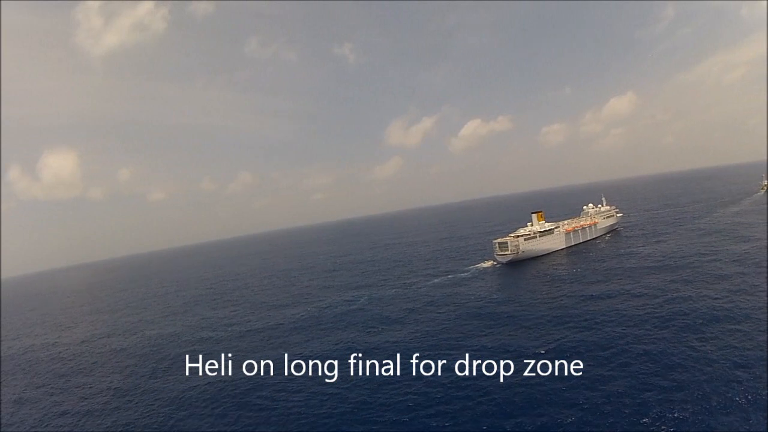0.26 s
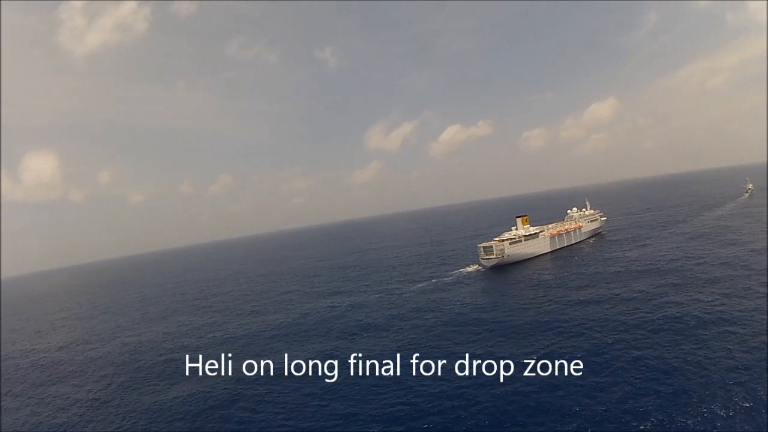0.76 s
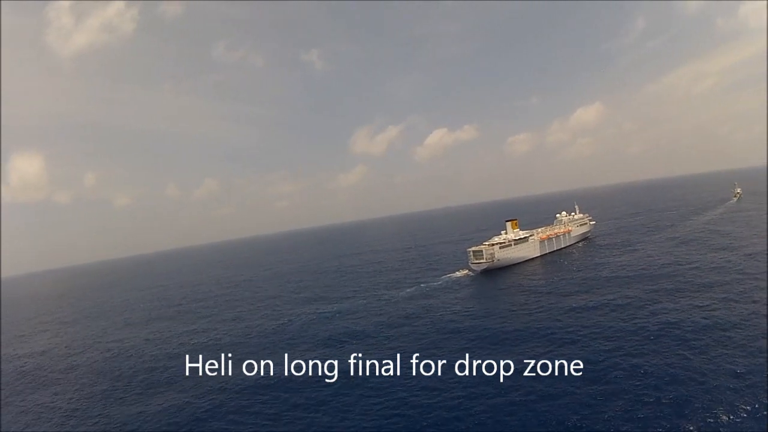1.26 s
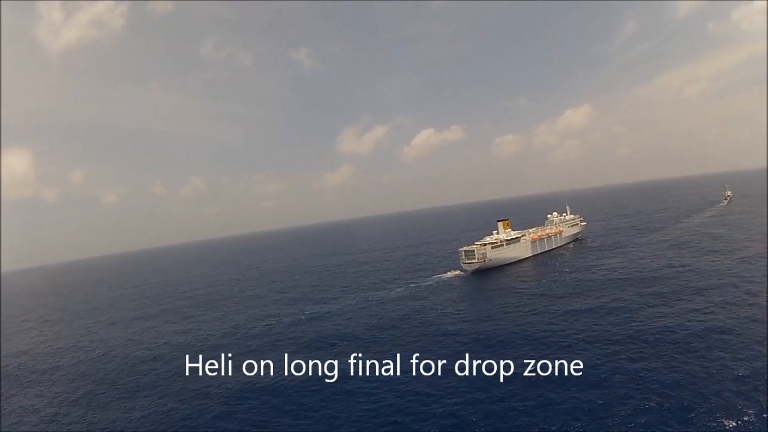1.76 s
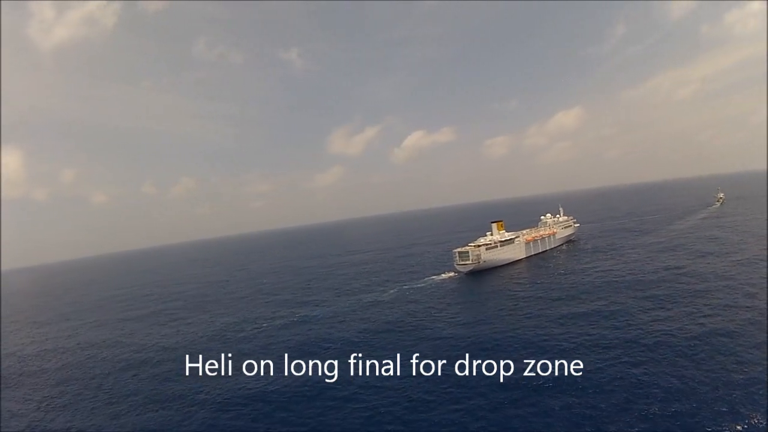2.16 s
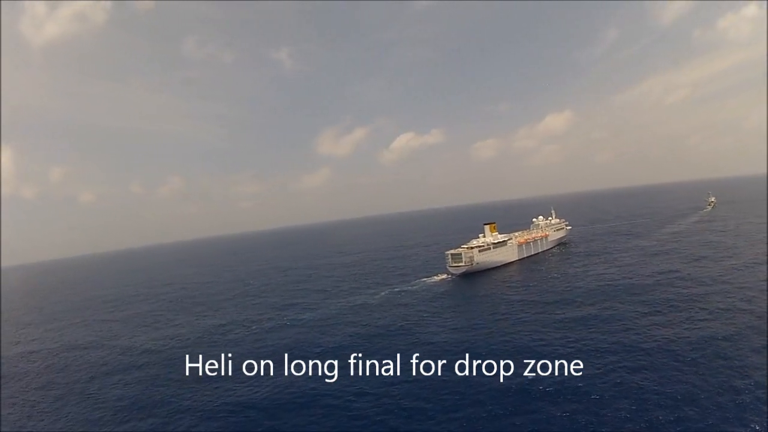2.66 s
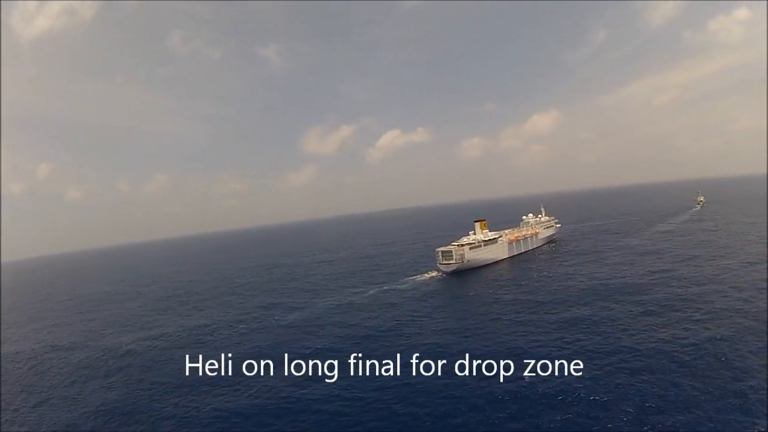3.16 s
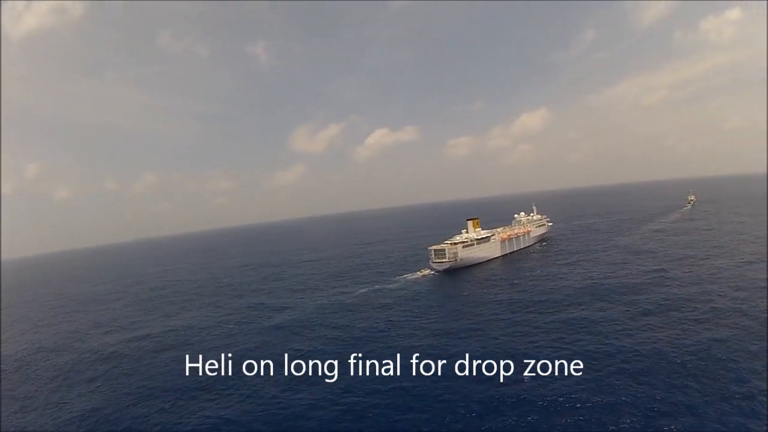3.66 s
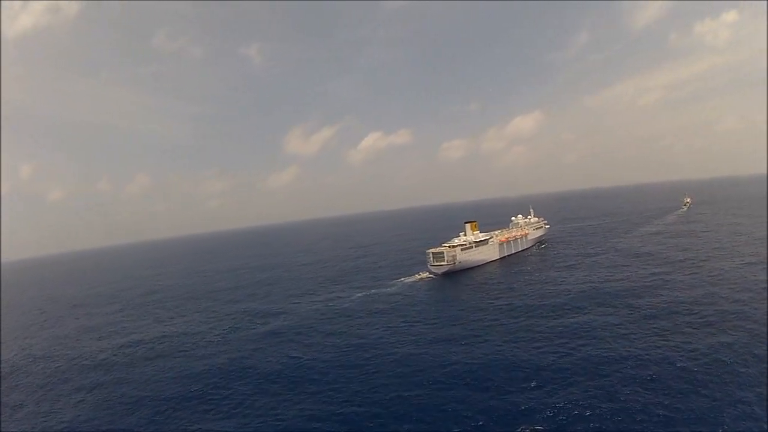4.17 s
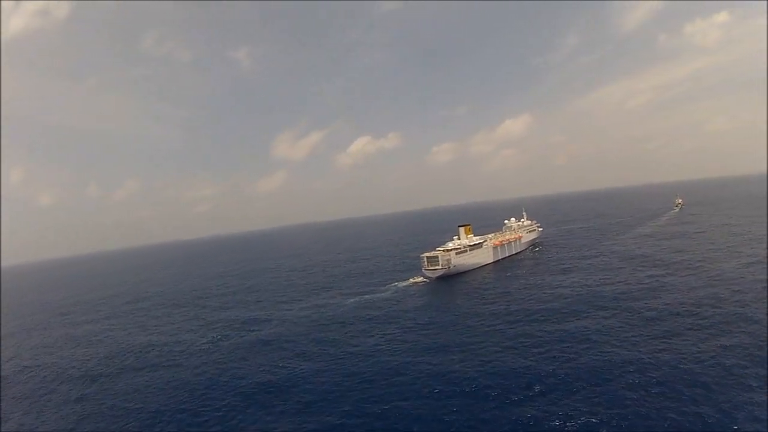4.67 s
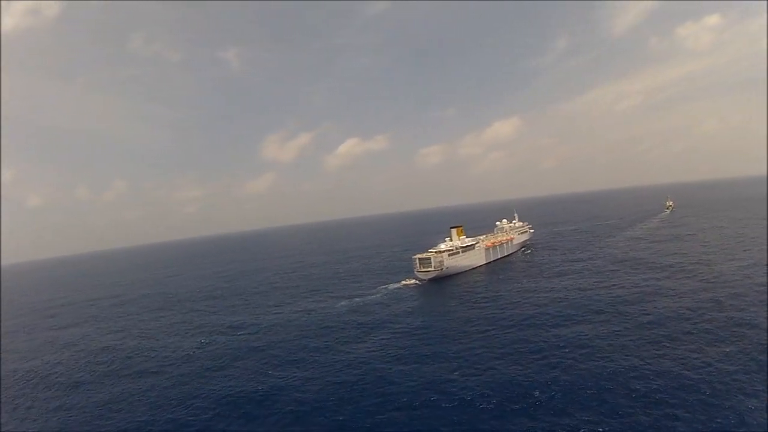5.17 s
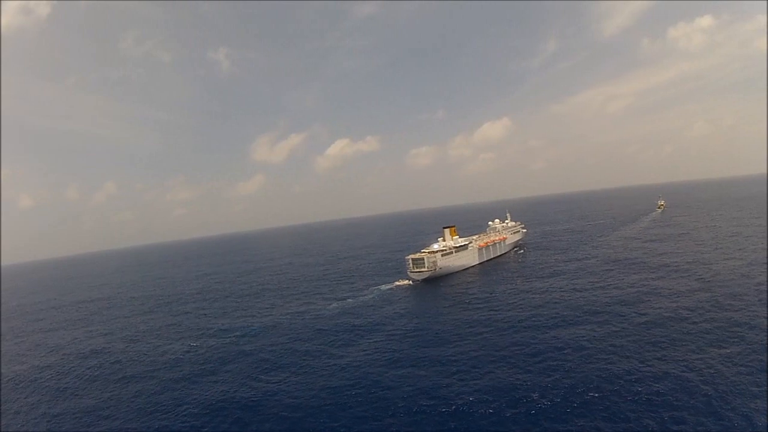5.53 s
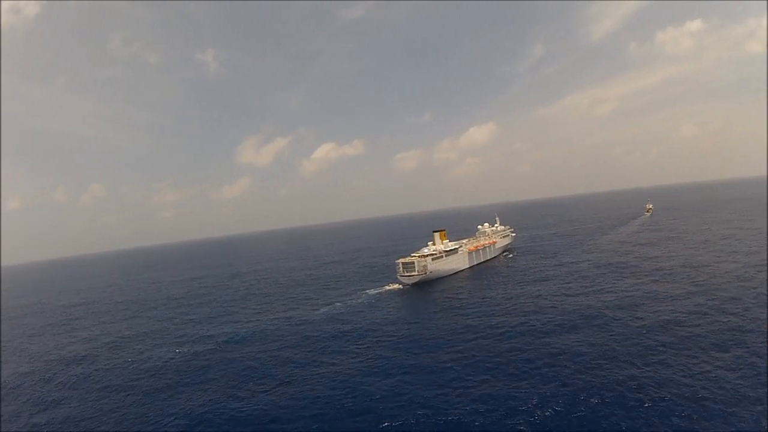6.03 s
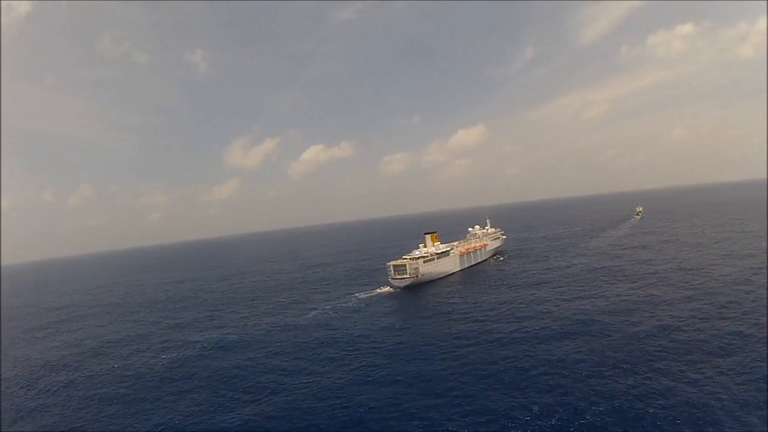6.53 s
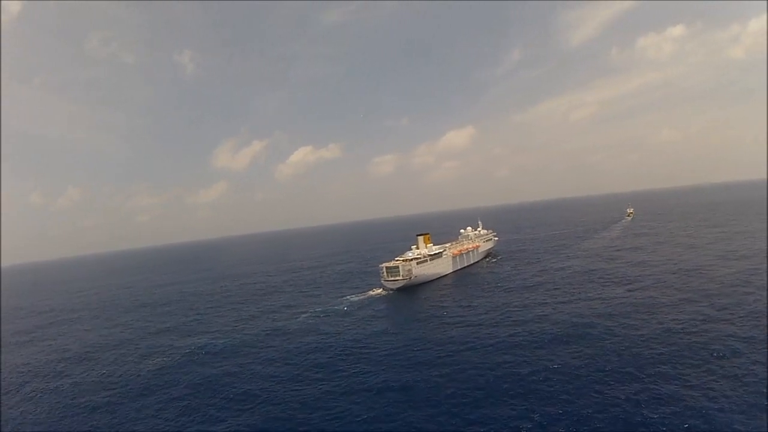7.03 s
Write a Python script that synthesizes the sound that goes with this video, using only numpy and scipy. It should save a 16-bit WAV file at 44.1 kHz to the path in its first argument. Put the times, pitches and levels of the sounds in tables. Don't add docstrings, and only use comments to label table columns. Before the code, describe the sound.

Heard from inside a helicopter flying over open sea, a deep, resonant rotor boom dominates without a break. It wavers in the first two seconds, dropping away briefly, then gradually grows stronger to the end. Low wind roar and a brighter swish are chopped about twenty times a second, with faint tail rotor and gear hums beneath. A small enclosed camera microphone gives a muffled, slightly gritty mono sound.

```python
import sys
import numpy as np
from scipy import signal
from scipy.fft import rfft, irfft, next_fast_len
from scipy.io import wavfile
from scipy.ndimage import uniform_filter1d, map_coordinates

SR = 44100
rng = np.random.default_rng(int(sys.argv[2]) if len(sys.argv) > 2 else 0)


def master(y):
    cut = np.clip(np.atleast_2d(y).T, -1, 1)
    pcm = np.round(cut * 32767)
    wavfile.write(sys.argv[1], SR, pcm.astype(np.int16))


def ratio(d):
    e = np.asarray(d, float) / 20
    return 10 ** e


N = 321930

# start_s, pass_rate_hz
ROTOR_SPEED = [(0.0, 20.333), (0.91, 20.315), (1.82, 20.272), (2.74, 20.264), (3.65, 20.24), (4.56, 20.297),
               (5.48, 20.257), (6.39, 20.263), (7.3, 20.316)]
FIRST_PASS = .0106
BLADES = 3
PASSES = FIRST_PASS + np.cumsum(np.interp(np.arange(N) / SR, *np.transpose(ROTOR_SPEED))) / SR

# multiple, level_db, unsteadiness_db
STEADY_MULTIPLES = [(2, -25, .6), (3, -32.5, 2), (7, -48, 3), (8, -53, 4), (9, -50, 4), (10, -52, 4),
                    (11, -54, 4), (12, -52, 3), (13, -59, 3), (15, -59, 4)]
# shaft_multiple, level_db
UNEQUAL_BLADES = [(7, -56), (8, -49), (10, -44), (11, -33), (13, -39), (14, -46)]
# pitch_hz, width_hz, level_db
CABIN_MODES = [(40.6, 3, 0), (81, 8, 0)]
# start_s, level_db
ROTOR_LOAD = [(0.0, -19.5), (0.45, -16.5), (1.3, -28), (1.7, -18.0), (2.3, -17.6), (3.2, -15.5), (4.2, -14),
              (5.1, -15.5), (5.85, -13.9), (6.0, -10.5), (7.3, -11)]
MEAN_LOAD_DB = -16
# centre_s, change_db
ROTOR_GUSTS = [(0.15, -2), (0.42, -3.5), (0.58, -22), (0.82, -1.5), (0.98, -3), (1.11, 7), (1.25, 6),
               (1.78, -7.5), (1.94, -8), (2.1, -16), (2.55, -3.5), (2.82, 1.5), (3.4, 3), (3.55, -4),
               (4.01, 2.5), (4.32, -5.5), (5.09, -4.5), (6.26, -2), (7.03, -1.5)]
GUST_S = .04
FIFTH_DB, FIFTH_GROWS, FIFTH_SHAKE_DB = -36, .25, 3.5
SIXTH_DB, SIXTH_GROWS, SIXTH_SHAKE_DB = -38, .85, 1.6

# pitch_hz, level_db, line_width_hz
GEAR_TONES = [(16.6, -63, 1), (49.7, -48, .6), (152, -56, 1), (253.2, -55, 1.5), (338, -51.5, 1.8),
              (592, -57, 6), (731, -58, 12), (1113.5, -59, 2), (1697, -55, 5)]
# freq_hz, level_db (per Hz)
BUFFET_SPECTRUM = [(10, -35), (30, -25), (45, -17), (57, -15), (65, -6), (75, -1), (82, -1), (92, -8),
                   (105, -12), (130, -19), (170, -50)]

# start_s, level_db
AIR_STRENGTH = [(0, -0.9), (.7, -1.4), (2.2, 0.37), (4.6, -0.32), (7.3, -0.35)]
# freq_hz, level_db (per Hz)
ROAR_SPECTRUM = [(100, 7), (135, 0), (200, -0.5), (245, -6), (275, -7), (330, -2), (450, -9), (560, -2.5),
                 (620, -4), (660, -9), (740, -0.5), (830, -3.5), (1050, -12), (1250, -37)]
# freq_hz, level_db (per Hz)
SWISH_SPECTRUM = [(850, -41), (1150, -4), (1350, -5.5), (1650, -1), (1900, -5.5), (2130, -1), (2550, -4),
                  (2700, -8), (3200, -16), (3700, -13), (4400, -21), (4750, -23), (5000, -27),
                  (5600, -25.5)]
ROAR_DB, ROAR_GROWS, SWISH_DB = -36, 0.062, -35.5
# freq_hz, moment_passes (fraction of a pass), depth_db
BLADE_LULL = [(300, .75, 2), (900, .2, 2.2), (1550, .09, 5.5), (2420, .38, 2.5), (2800, .17, 5.5),
              (3250, .12, 1.5), (3750, .19, 6), (5600, .12, 4)]
# start_passes, low_hz, end_passes, high_hz, level_db
ECHO_STROKES = [(.1, 200, .4, 300, 2), (.45, 650, .8, 1200, 2.2), (.82, 700, 1.08, 1200, 3.5),
                (.28, 1420, .72, 1750, 3.5), (.66, 1800, 1.02, 2250, 5.8), (.92, 2450, 1.06, 2600, 4),
                (.29, 2620, .41, 2780, 7), (.55, 2930, .75, 3050, 4), (.66, 3650, .9, 3720, 4.2),
                (.5, 4150, .82, 4450, 3.6), (.5, 4750, .9, 5450, 3.8)]
STROKE_HZ, STROKE_WIDENS = 120, .025

# freq_hz, level_db
SLOW_RATE_FILTER = [(5600, 0), (5800, -8), (6000, -12), (6200, -30), (6400, -120)]
HOLD_HZ, STEP_HZ, TOP_HZ = 12000, 48000, 15310


def unit(x):
    return x / np.sqrt(np.mean(x ** 2) + 1e-20)


def along(points, hz, axis=1):
    table = np.array(points)
    return np.interp(np.log(hz + 1), np.log(table[:, 0] + 1), table[:, axis])


def curves(rows):
    s, *columns = np.transpose(rows)
    return [np.interp(np.arange(N) / SR, s, column) for column in columns]


def wobble(rate):
    coarse = np.arange(0, N + 64, 64)
    knots = rng.standard_normal(int(N * rate / SR) + 4)
    return np.interp(np.arange(N), coarse, map_coordinates(knots, [coarse * rate / SR]))


def filtered(x, response):
    m = next_fast_len(N + 8192)
    return irfft(rfft(x, m) * response(np.fft.rfftfreq(m, 1 / SR)), m)[:N]


def extra_load_db():
    return uniform_filter1d(curves(ROTOR_LOAD)[0], size=SR // 2) - MEAN_LOAD_DB


def hums():
    t = np.arange(N) / SR
    total = np.zeros(N)
    for hz, db, width in GEAR_TONES:
        level = np.sqrt(2) * ratio(db + 1.8 * wobble(width))
        total += level * np.cos(2 * np.pi * hz * t + 1.5 * wobble(width))
    return total


def patches(shape, bins, frames):
    field = uniform_filter1d(rng.standard_normal(shape), size=bins, axis=0)
    return unit(uniform_filter1d(field, size=frames, axis=1))


def blade_pattern(hz, count):
    def since(moment):
        return (count - moment + .5) % 1 - .5

    lull_depth_db = along(BLADE_LULL, hz, axis=2)
    gain_db = -lull_depth_db * np.exp(-(since(along(BLADE_LULL, hz)) / .15) ** 2)
    for start, low_hz, end, high_hz, db in ECHO_STROKES:
        middle = (start + end) / 2
        place = since(middle) / (end - start)
        centre_hz = (low_hz + high_hz) / 2 + place * (high_hz - low_hz)
        width_hz = STROKE_HZ + STROKE_WIDENS * low_hz
        which_pass = np.round(count - middle).astype(int) + 1
        luck = rng.standard_normal(int(count[-1]) + 3)[which_pass]
        in_time = np.exp(-(2 * place) ** 4)
        in_pitch = np.exp(-((hz - centre_hz) / width_hz) ** 2)
        gain_db += db * (1 + .24 * luck) * in_time * in_pitch
    return gain_db


def chopped(spectrum, depth, patchy_db, scatter_db):
    hz, t, z = signal.stft(rng.standard_normal(N), SR, nperseg=384, noverlap=288)
    at = np.minimum((t * SR).astype(int), N - 1)
    low = hz < spectrum[-1][0]
    z[low] *= ratio(depth * blade_pattern(hz[low, None], PASSES[at]))
    lead_db = .35 * np.cos(2 * np.pi * (PASSES[at] / BLADES - .92))
    gain = ratio(lead_db + patchy_db * patches(z.shape, 3, 6) + scatter_db * wobble(35)[at])
    noise = signal.istft(z * gain, SR, nperseg=384, noverlap=288)[1][:N]
    return unit(filtered(noise, lambda f: ratio(along(spectrum, f)) * (f > spectrum[0][0])))


def airflow():
    air_db, = curves(AIR_STRENGTH)
    roar = chopped(ROAR_SPECTRUM + [(1500, -120)], depth=1.5, patchy_db=1.6, scatter_db=.5)
    swish = chopped(SWISH_SPECTRUM + [(6500, -28)], depth=1.38, patchy_db=1, scatter_db=.5)
    roar_db = ROAR_DB + .5 * air_db + ROAR_GROWS * extra_load_db()
    return ratio(roar_db) * roar + ratio(SWISH_DB + air_db) * swish


def buffet():
    noise = unit(filtered(rng.standard_normal(N), lambda hz: ratio(along(BUFFET_SPECTRUM, hz))))
    return ratio(-34 + .5 * extra_load_db()) * noise


def cabin_tone(multiple, db, drift, lag=0):
    f = multiple * (PASSES[-1] - FIRST_PASS) * SR / N
    response = sum(ratio(g) * 1j * f * w / (c * c - f * f + 1j * f * w) for c, w, g in CABIN_MODES)
    phase = 2 * np.pi * multiple * PASSES + np.angle(response) - lag + drift * wobble(2.993)
    return np.sqrt(2) * ratio(db) * np.cos(phase)


def rotor():
    load_db, = curves(ROTOR_LOAD)
    t = np.arange(N) / SR
    gust_db = sum(db * np.exp(-((t - s) / GUST_S) ** 2) for s, db in ROTOR_GUSTS)
    boom = cabin_tone(4, load_db + gust_db, drift=.18)
    fifth_db = FIFTH_DB + FIFTH_GROWS * extra_load_db() + FIFTH_SHAKE_DB * wobble(6)
    sixth_db = SIXTH_DB + SIXTH_GROWS * extra_load_db() + SIXTH_SHAKE_DB * wobble(7)
    upper = cabin_tone(5, fifth_db, drift=.9) + cabin_tone(6, sixth_db, drift=.4)
    first = cabin_tone(1, -41 + wobble(2), drift=.2, lag=-1.4)
    steady = sum(cabin_tone(k, db + shake_db * wobble(3.5), drift=.18 * shake_db)
                 for k, db, shake_db in STEADY_MULTIPLES)
    throb = sum(cabin_tone(k / BLADES, db + 1.5 * wobble(2.5), drift=.35, lag=.9)
                for k, db in UNEQUAL_BLADES)
    return boom + upper + first + steady + throb


def scene():
    return (hums() + airflow() + buffet() + rotor())[None]


def roll_off(x):
    return signal.sosfilt(signal.butter(12, 16050, fs=SR, output="sos"), x)


def record(dry):
    slow = filtered(dry[0], lambda f: ratio(along(SLOW_RATE_FILTER, f)))
    mirrored = slow * (1 + 2 * np.cos(2 * np.pi * HOLD_HZ * np.arange(N) / SR))

    def hold(f):
        droop = np.sinc(f / HOLD_HZ) / np.sinc(f / STEP_HZ)
        return droop * np.exp(-1j * np.pi * f / HOLD_HZ)

    held = filtered(mirrored, lambda f: hold(f) * (f < TOP_HZ))
    return roll_off(held[None])


dry = scene()
out = record(dry)
master(out)
```